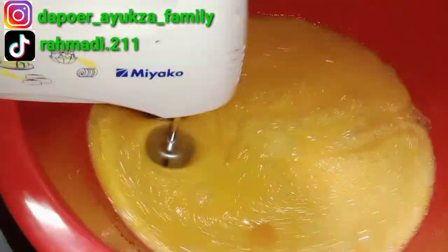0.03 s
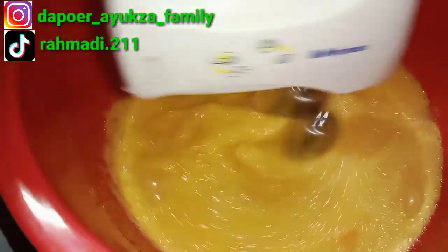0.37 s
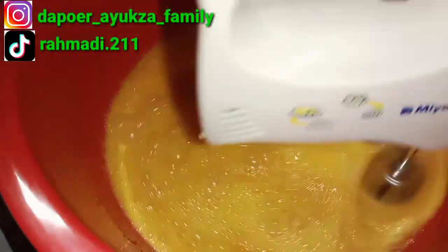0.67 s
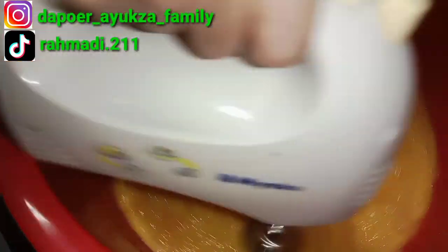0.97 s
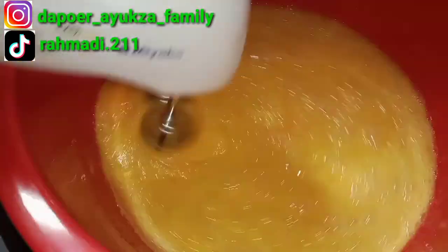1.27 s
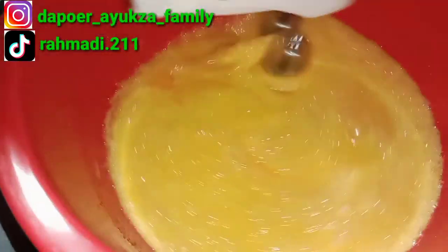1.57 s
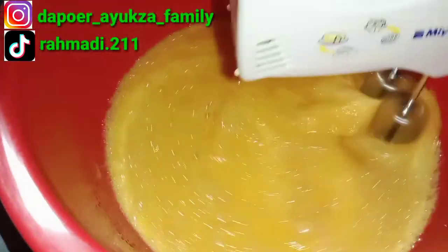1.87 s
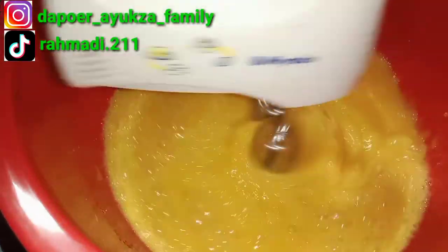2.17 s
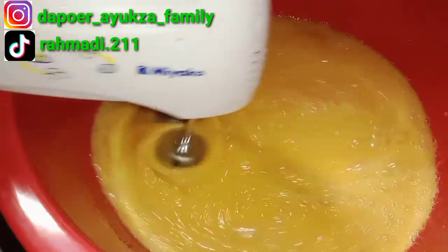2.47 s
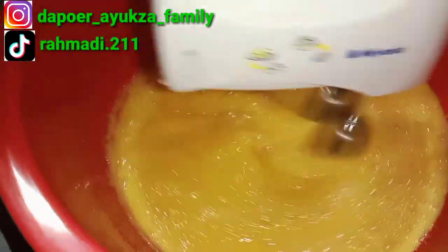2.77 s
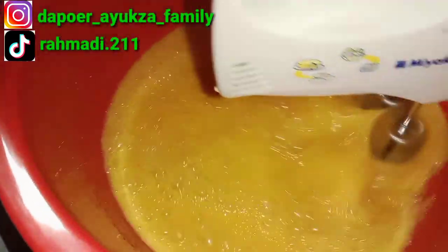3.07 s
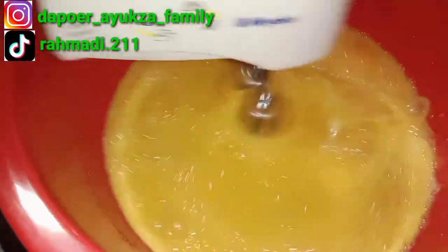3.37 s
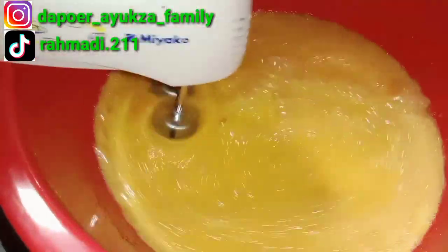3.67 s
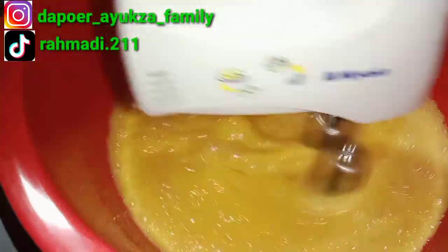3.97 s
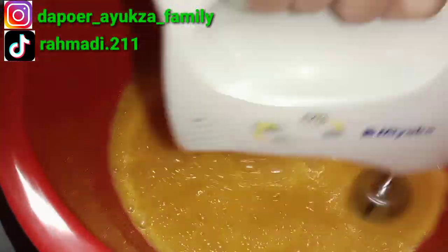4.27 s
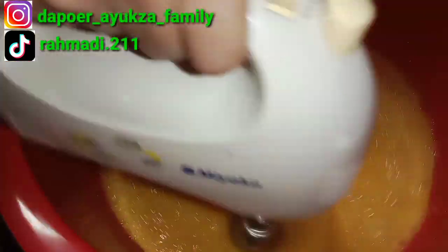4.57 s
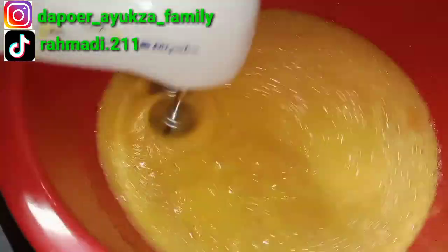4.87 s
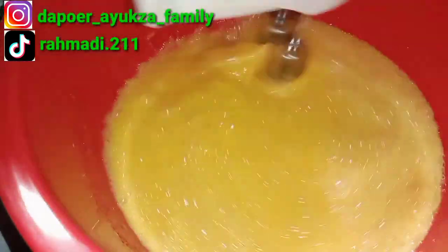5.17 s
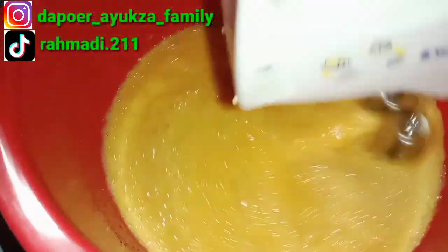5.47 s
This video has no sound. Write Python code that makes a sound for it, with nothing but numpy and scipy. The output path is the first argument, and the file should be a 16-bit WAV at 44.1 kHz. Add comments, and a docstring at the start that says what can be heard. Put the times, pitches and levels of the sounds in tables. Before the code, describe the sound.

Close, constant hum and whine of a hand mixer whisking eggs and sugar, with soft churning and beaters clacking against a plastic bowl.

```python
"""A humming, whining electric hand mixer beats eggs and sugar in a plastic bowl, close by.
Its motor slows a little in the thick batter, its gears rattle and its carbon brushes hiss.
The beaters chatter and churn, and now and then they scrape or knock the bowl.
Twice a flying drop of batter lands with a tick."""
import sys
import numpy as np
from scipy import signal
from scipy.fft import rfft, irfft, next_fast_len
from scipy.io import wavfile
from scipy.ndimage import uniform_filter1d, map_coordinates

SR = 44100
rng = np.random.default_rng(int(sys.argv[2]) if len(sys.argv) > 2 else 0)


def store_pcm(level_fs):
    """Save levels as 16-bit WAV."""
    pcm = np.round(np.clip(level_fs, -1, 1) * 32767).astype(np.int16)
    wavfile.write(sys.argv[1], SR, np.atleast_2d(pcm).T)


N = 247842


def amp(db):
    """Turn decibels into a number to multiply by."""
    return 10 ** (np.asarray(db) / 20)


def unit(x):
    """Scale a signal to an average strength (rms) of 1."""
    return x / np.sqrt(np.mean(x ** 2) + 1e-20)


def curve(rows):
    """Join (time_s, value) points with straight lines, one value per sample."""
    times, values = np.transpose(rows)
    return np.interp(np.arange(N) / SR, times, values)


def above_average(rows):
    """How far a curve lies above its own average at each moment."""
    values = curve(rows)
    return values - values.mean()


def wobble(rate_hz):
    """A smooth random curve that passes through rate_hz new values a second."""
    coarse = np.arange(0, N + 32, 32)
    knots = rng.standard_normal(len(coarse))
    smooth = map_coordinates(knots, [coarse * rate_hz / SR], mode="wrap")
    return np.interp(np.arange(N), coarse, smooth)


def gate(start_s, length_s, attack_s, release_s):
    """Fade in to reach 1 at start_s, hold for length_s, then fade out."""
    since = np.arange(N) / SR - start_s
    return np.clip(np.minimum(1 + since / attack_s, 1 - (since - length_s) / release_s), 0, 1)


def coloured(x, points, size=8192):
    """Make some pitches louder and others softer, following (pitch_hz, gain_db) points."""
    point_hz, db = np.transpose(points)
    hz = np.fft.rfftfreq(size, 1 / SR)
    gain = amp(np.interp(np.log(hz + 1), np.log(point_hz), db))
    cepstrum = irfft(np.log(gain))
    cepstrum[1:size // 2] *= 2  # folded so that the filter rings after a tap, never before
    cepstrum[size // 2 + 1:] = 0
    return signal.oaconvolve(x, irfft(np.exp(rfft(cepstrum))))[:N]


def resonant(x, modes):
    """Let x ring an object whose notes are rows of (pitch_hz, width_hz, gain_db)."""
    return sum((-1) ** k * amp(db) * signal.lfilter(*signal.iirpeak(hz, hz / width, fs=SR), x)
               for k, (hz, width, db) in enumerate(modes))


def impacts(cycles, scatter, spread_db):
    """One tap per cycle, early or late by chance and of uneven size."""
    timing, side, strength = rng.standard_normal((int(cycles[-1]), 3)).T
    tap_cycles = (np.arange(len(timing)) + scatter * timing) % cycles[-1]
    at = np.interp(tap_cycles, cycles, np.arange(N))
    sizes = np.sign(side) * amp(spread_db * np.clip(strength, -2, 2))
    return unit(np.bincount(at.astype(int), sizes, N))


def shifting(x, depth_db):
    """Echoes in the bowl change as the mixer moves, so patches of pitch rise and fall in level."""
    spectrum = signal.stft(x, nperseg=512)[2]
    patches = rng.standard_normal(spectrum.shape)
    for _ in range(2):
        patches = uniform_filter1d(patches, size=3, axis=0)  # smooth across pitch
        patches = uniform_filter1d(patches, size=28, axis=1)  # smooth across time
    return unit(signal.istft(spectrum * amp(depth_db * unit(patches)), nperseg=512)[1][:N])


def tone(turns, per_turn, swell_db, flutter_db, jitter):
    """One motor note: it swells as the mixer turns in the hand and shakes with the load."""
    level = amp(swell_db * wobble(6.9) + flutter_db * wobble(90))
    return unit(level * np.sin(2 * np.pi * per_turn * turns + jitter * wobble(120)))


# How fast the motor spins: time_s, speed_hz
SHAFT_SPEED = [(0, 265.6), (.18, 263.9), (.57, 270.6), (.95, 263.5), (1.25, 262.5), (1.9, 266.8),
               (2.35, 265.6), (2.55, 262.6), (2.92, 267), (3.38, 259.9), (3.72, 261.7), (4.0, 268.6),
               (4.17, 270.5), (4.45, 265), (4.95, 264.6), (5.3, 268.6), (5.62, 267.7)]

def shaft_turns():
    """Count the turns so far; the motor slows in thick batter and picks up again."""
    return np.cumsum(curve(SHAFT_SPEED) * (1 + .0003 * wobble(25))) / SR


# How loud the hum is: time_s, level_db
HUM_LEVEL = [(0, -38.5), (.27, -46), (.35, -40), (1.0, -38.5), (1.38, -45), (1.8, -38.5), (2.4, -44),
             (2.83, -39.5), (3.2, -43), (3.46, -37.5), (3.54, -48.5), (4.1, -38.5), (4.25, -46),
             (4.35, -41), (5.62, -41)]
# How loud the note an octave above it is: time_s, level_db
OCTAVE_LEVEL = [(0, -59), (.85, -36.5), (1.3, -56), (2.6, -43.5), (3.5, -59), (4.35, -43), (5.62, -52)]

def motor_hum(turns):
    """The motor's two magnetic poles hum at twice the shaft speed, and an octave higher."""
    hum = tone(turns, per_turn=2, swell_db=.5, flutter_db=1.5, jitter=.16)
    octave = tone(turns, per_turn=4, swell_db=.1, flutter_db=4, jitter=.81)
    return amp(curve(HUM_LEVEL)) * hum + amp(curve(OCTAVE_LEVEL)) * octave


# How loud the whine is: time_s, level_db
WHINE_LEVEL = [(0, -33.5), (.23, -29), (.36, -45), (.58, -32.5), (.76, -43.5), (1.1, -28), (1.35, -37),
               (1.75, -47), (2.36, -33), (2.78, -40), (2.83, -32.5), (3.01, -45), (3.2, -35), (3.32, -56),
               (3.38, -39), (3.65, -31), (3.87, -37), (4.08, -30.5), (4.25, -42.5), (4.51, -32),
               (4.93, -36), (4.99, -51), (5.62, -37.5)]
# Fainter motor notes: cycles_per_turn, level_db
FAINT_NOTES = [(6, -51.5), (8, -46), (17, -46.5)]

def motor_whine(turns):
    """The whine roughens as the gears rattle; the motor's spinning contacts whistle above it."""
    roughness = .35 * amp(above_average(RATTLE_LEVEL))
    whine = tone(turns, per_turn=18, swell_db=.7, flutter_db=2.8, jitter=roughness)
    throb = 1 + .5 * np.cos(2 * np.pi * 2 * turns)  # each of the two poles shakes the brushes
    whistle = throb * tone(turns, per_turn=48, swell_db=2.5, flutter_db=1.8, jitter=.3)
    faint = sum(amp(db) * tone(turns, per_turn, swell_db=2, flutter_db=4, jitter=.4)
                for per_turn, db in FAINT_NOTES)
    return amp(curve(WHINE_LEVEL)) * whine + amp(-49.5) * whistle + faint


# The notes of the gear case: pitch_hz, width_hz, gain_db
GEAR_CASE_NOTES = [(4510, 510, 0.5), (4940, 150, -1)]

def gear_rasp(turns):
    """The screw-shaped gear catches once a turn and rings its case: a rough edge on the whine."""
    catches = impacts(turns, scatter=.2, spread_db=2) + amp(-3) * rng.standard_normal(N)
    ring = sum(resonant(resonant(catches, [note]), [note]) for note in GEAR_CASE_NOTES)
    level_db = -38 + 1.56 * above_average(RATTLE_LEVEL) + .35 * above_average(WHINE_LEVEL)
    return amp(level_db) * unit(ring)


# How loud the gears rattle: time_s, level_db
RATTLE_LEVEL = [(0, -33), (.4, -35), (.8, -34), (1.08, -31), (1.33, -35.5), (1.55, -33.5), (1.67, -36.5),
                (2.43, -35), (3.11, -36.5), (4.24, -36.5), (4.55, -33), (4.9, -34.5), (5.08, -32.5),
                (5.25, -37), (5.62, -35.5)]
# The notes of the mixer's shell: pitch_hz, width_hz, gain_db
SHELL_NOTES = [(3235, 350, -5), (3913, 250, 2), (4560, 320, -4.5), (4910, 120, -1.5)]

def gear_rattle(turns):
    """Loose gear teeth slap about twice a turn and ring the mixer's shell."""
    slaps = impacts(2 * turns, scatter=.3, spread_db=-1) + amp(2.5) * rng.standard_normal(N)
    ring = resonant(slaps, SHELL_NOTES)
    ring = coloured(ring, [(1500, -17), (3000, 5.5), (5100, 2), (6000, -13), (10000, -23)])
    return amp(curve(RATTLE_LEVEL)) * shifting(ring, depth_db=1.7)


# The tone colour of the brushes' hiss: pitch_hz, gain_db
HISS_COLOUR = [(2500, -32), (4000, -13.5), (5300, -5.5), (5950, -12), (6600, -7), (7400, -3), (8500, -1.5),
               (9600, -7.5), (11500, -11), (13200, -16.5), (15500, -21.5)]
# The note of the brush holders: pitch_hz, width_hz, gain_db
HOLDER_NOTE = [(7724, 395, 0)]
# How loud the holders ring: time_s, level_db
HOLDER_LEVEL = [(0, -35), (.09, -33), (.3, -39.5), (.72, -32), (.83, -35), (2.19, -53.5), (2.3, -37),
                (2.6, -44), (3.35, -36), (3.43, -41.5), (5.62, -41.5)]

def brushes(turns):
    """Carbon brushes rub and spark on 24 spinning contacts, more under load; their holders ring."""
    sparks = impacts(24 * turns, scatter=.4, spread_db=9)
    air = amp(2) * rng.standard_normal(N)
    hiss_db = -32.5 + .58 * above_average(BEATER_EFFORT) + .8 * wobble(110)
    hiss = shifting(coloured(sparks + air, HISS_COLOUR), depth_db=2.13)
    holders = resonant(resonant(rng.standard_normal(N), HOLDER_NOTE), HOLDER_NOTE)
    return amp(hiss_db) * hiss + amp(curve(HOLDER_LEVEL)) * unit(holders)


# How hard the beaters work, given as the loudness of their chatter: time_s, level_db
BEATER_EFFORT = [(0, -30), (.2, -30), (.4, -29.5), (.75, -29.5), (1.15, -28.5), (1.33, -29.5), (1.58, -27),
                 (1.68, -30), (1.88, -30), (2.12, -33), (2.37, -30.5), (2.9, -32), (3.3, -32.5),
                 (3.48, -30.5), (3.8, -29), (4.25, -31), (4.75, -32), (5.22, -28.5), (5.48, -30.5)]
# The tone colour of the beaters: pitch_hz, gain_db
BEATER_COLOUR = [(100, -60), (250, -44), (340, -13.5), (470, -10), (600, -4), (780, -10.5), (1030, -5),
                 (1280, -9), (1700, 0), (2200, -1.5), (2700, -2), (3200, -10), (3800, -25.5), (6000, -38.5)]

def beater_chatter(turns):
    """The beaters chatter unevenly in their sockets as the blades drag through the batter."""
    drag = amp(1.5 * wobble(70))
    taps = impacts(4 * turns, scatter=.5, spread_db=.5) + rng.standard_normal(N)
    chatter = coloured(unit(drag * taps), BEATER_COLOUR)
    return amp(curve(BEATER_EFFORT)) * shifting(chatter, depth_db=1.5)


BLADES_PER_TURN = 3 / 8  # blades that pass for each turn of the motor
# The short notes of the beater wires: pitch_hz, width_hz, gain_db
WIRE_NOTES = [(1813, 220, 4), (2257, 520, 3)]

def blade_ticks(turns):
    """Passing blades clip the bowl in crisp ticks that stand out as the beaters work harder."""
    taps = impacts(BLADES_PER_TURN * turns, scatter=.5, spread_db=2.5)
    level_db = -37 + 1.7 * above_average(BEATER_EFFORT)
    return amp(level_db) * unit(coloured(resonant(taps, WIRE_NOTES), BEATER_COLOUR))


# The beaters push into a wave of batter: start_s, length_s, churn_db, boom_strength_db
BATTER_WAVES = [(0.004, 0.046, -46, -51), (0.11, 0.29, -44, -48), (0.862, 0.04, -44.5, -49),
                (1.078, 0.12, -44, -32.5), (1.256, 0.046, -45, -44), (1.357, 0.14, -43, -42),
                (1.542, 0.091, -48.5, -60), (1.676, 0.25, -41, -45), (1.988, 0.029, -43.5, -50),
                (2.356, 0.326, -44.5, -33), (3.032, 0.028, -39.5, -45), (3.367, .04, -49, -50),
                (3.494, 0.095, -45, -60), (3.643, 0.3, -43, -39), (4.082, 0.093, -48.5, -47.5),
                (4.83, 0.031, -48, -62), (4.93, 0.43, -44.5, -42), (5.567, 0.041, -45, -63)]

def sloshing():
    """How strongly the batter churns and the bowl booms: waves come in gulps over light lapping."""
    churn, boom = np.zeros((2, N))
    for start_s, length_s, churn_db, boom_strength_db in BATTER_WAVES:
        wave = gate(start_s, length_s, attack_s=.014, release_s=.032)
        churn += amp(churn_db) * wave
        boom += amp(boom_strength_db) * wave
    gulps = amp(2.5 * wobble(18))
    lapping = amp(-60 + 4.5 * wobble(13))
    return np.hypot(churn * gulps, lapping), boom


# The tone colour of the batter's soft wash: pitch_hz, gain_db
WASH_COLOUR = [(55, -41), (90, -18.5), (140, -0.5), (200, -12), (300, 3.5), (450, 2.5), (900, -36)]
# The low note of the filled bowl: pitch_hz, width_hz, gain_db
BOWL_NOTE = [(196, 18, 0)]

def batter(churn, boom, count=300):
    """Blades fold in air: short low glugs rise in pitch over a soft wash, and the bowl booms along."""
    delay, pitch, size = rng.random((count, 3)).T[:, :, None]
    t = np.arange(SR // 12) / SR
    start_hz = 175 * 2.1 ** pitch
    cycles = start_hz * t * (1 + 2.95 * t)
    envelope = np.exp(-cycles / 4) * (1 - np.exp(-cycles))
    glugs = amp(8 * size) * np.sin(2 * np.pi * cycles) * envelope
    start = (np.arange(count)[:, None] + delay) / count  # one glug in each equal slice of time
    at = (start * N).astype(int) + np.arange(len(t))
    bubbling = unit(np.bincount(at.ravel(), glugs.ravel())[:N])
    wash = amp(3.5 * wobble(30)) * unit(coloured(rng.standard_normal(N), WASH_COLOUR))
    bowl = unit(resonant(resonant(rng.standard_normal(N), BOWL_NOTE), BOWL_NOTE))
    return churn * unit(bubbling + wash) + amp(-16.5) * boom * bowl


# A beater rubs the bowl: middle_s, half_length_s, pitch_hz, level_db, grit_above_ring_db
BOWL_SCRAPES = [(0.08, 0.053, 1800, -29, -16), (0.205, 0.029, 2020, -30, -5), (0.69, 0.027, 1900, -29, -7),
                (1.577, .07, 2220, -34, 0.5), (2.552, .03, 1780, -34, -4), (3.046, .016, 2280, -34.5, 5),
                (4.393, 0.045, 1870, -32, -13), (5.178, .01, 1791, -35.5, 5), (5.585, .02, 1920, -31, -1.5)]

def scrapes(turns, skips_per_s=1100, ring_width_hz=74):
    """A blade skips along the plastic and makes the steel wires sing a rough note."""
    bite = amp(4 * np.cos(2 * np.pi * BLADES_PER_TURN * turns))  # harder as each blade comes round
    skips = bite * impacts(skips_per_s * np.arange(N) / SR, scatter=.5, spread_db=2)
    grit = unit(coloured(skips, BEATER_COLOUR))
    out = np.zeros(N)
    for middle_s, half_s, hz, db, grit_db in BOWL_SCRAPES:
        ring = unit(resonant(skips, [(hz, ring_width_hz, 0)]))
        contact = gate(middle_s - half_s, 2 * half_s, attack_s=.0066, release_s=.014)
        out += amp(db) * contact * (ring + amp(grit_db) * grit)
    return out


# A beater hits the bowl: start_s, level_db, pitch_hz
BOWL_KNOCKS = [(.0283, -17, 1820), (.0498, -16, 1870), (.6554, -17, 1960), (.6729, -17, 1890),
               (.6845, -15.5, 1880), (.6942, -17.5, 1920), (.7738, -18.5, 2080), (.8036, -15.5, 2190),
               (.8126, -14.5, 1990), (.8969, -14.5, 1840), (.9262, -18, 2150), (.9457, -16, 2100),
               (1.0006, -14.5, 2030), (1.5335, -18, 1480), (1.5793, -17.5, 1520), (1.6077, -17, 2200),
               (1.726, -19, 2280), (1.8043, -19.5, 2090), (1.886, -20, 1750), (2.5501, -18, 1840),
               (3.0235, -14, 2150), (3.0434, -18, 1970), (3.3518, -17.5, 2000), (3.6351, -17.5, 1990),
               (3.7035, -18.5, 1980), (3.92, -23, 610), (4.4079, -18.5, 1160), (5.0562, -19, 2300),
               (5.1302, -14.5, 1900), (5.1395, -17, 2150), (5.1672, -19, 1890), (5.1991, -18, 2170),
               (5.2445, -15.5, 1990), (5.2555, -18, 1700), (5.2949, -18, 2140), (5.3455, -19, 2200),
               (5.3645, -18, 2200), (5.5593, -16.5, 1960), (5.594, -20.5, 950)]
# The tone colour of the plastic's thud: pitch_hz, gain_db
THUD_COLOUR = [(50, -34), (200, -31), (600, 2.5), (1100, 1), (1600, 7), (4000, -31)]

def knocks(rise_s=.0007, fade_s=.028):
    """A beater strikes the bowl: a very short ring, a crack and a dull plastic thud."""
    rings, hits = np.zeros((2, N + SR))
    t = np.arange(SR // 30) / SR
    swell = t / rise_s * np.exp(1 - t / rise_s)
    for start_s, db, hz in BOWL_KNOCKS:
        at = round(start_s * SR)
        rings[at:at + len(t)] += amp(db) * swell * np.sin(2 * np.pi * hz * t)
        hits[at:at + len(t)] += amp(db - 60 * t / fade_s) * rng.standard_normal(len(t))
    crack = amp(3) * coloured(hits, BEATER_COLOUR)
    thud = amp(-9) * coloured(hits, THUD_COLOUR)
    return rings[:N] + crack + thud


# Drops of batter flicked off the beaters: start_s, level_db
DROPS = [(.612, -23), (1.291, -21)]

def spatter(fade_s=.014):
    """Each drop lands with a thin, bright tick."""
    out = np.zeros(N)
    t = np.arange(SR // 50) / SR
    for start_s, db in DROPS:
        at = round(start_s * SR)
        out[at:at + len(t)] += amp(db - 60 * t / fade_s) * rng.standard_normal(len(t))
    return coloured(out, [(3000, -25), (11000, -6), (15000, 0)])


def scene():
    """One shaft drives the motor's sounds and the beaters; mixer and bowl add up in one channel."""
    turns = shaft_turns()
    churn, boom = sloshing()
    motor = motor_hum(turns) + motor_whine(turns)
    mixer = motor + gear_rasp(turns) + gear_rattle(turns) + brushes(turns)
    beaters = beater_chatter(turns) + blade_ticks(turns) + knocks() + scrapes(turns)
    return (mixer + beaters + batter(churn, boom) + spatter())[None]


def record(dry):
    """The level dips briefly once, and the very highest treble is cut away."""
    dip_db = -5 * gate(start_s=4.216, length_s=.06, attack_s=.0019, release_s=.021)
    size = 2 * next_fast_len(N // 2 + 8192)
    hz = np.fft.rfftfreq(size, 1 / SR)
    spectrum = rfft(dry * amp(dip_db), size)
    return irfft(spectrum * (hz < 15550), size)[:, :N]


dry = scene()
out = record(dry)
store_pcm(out)
```